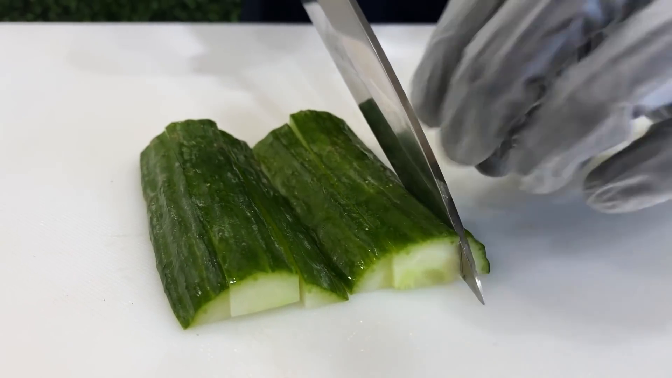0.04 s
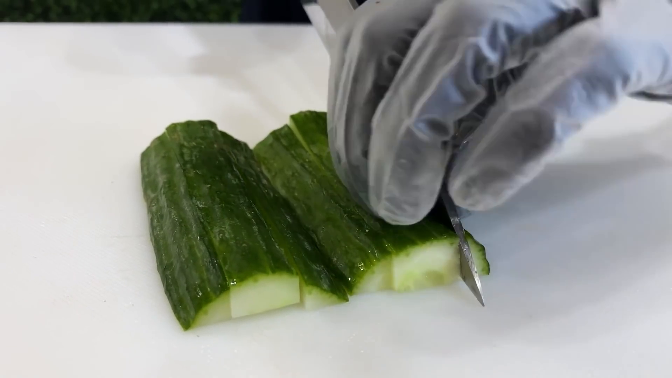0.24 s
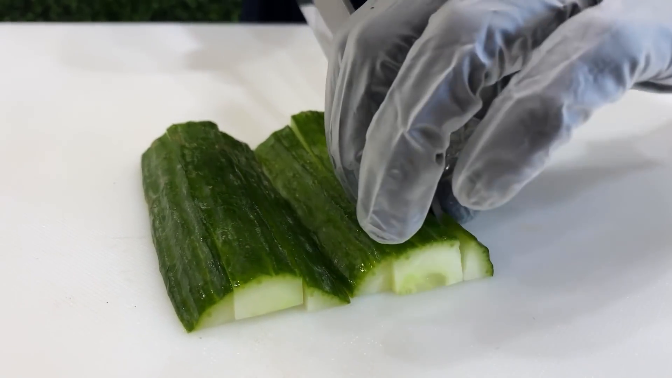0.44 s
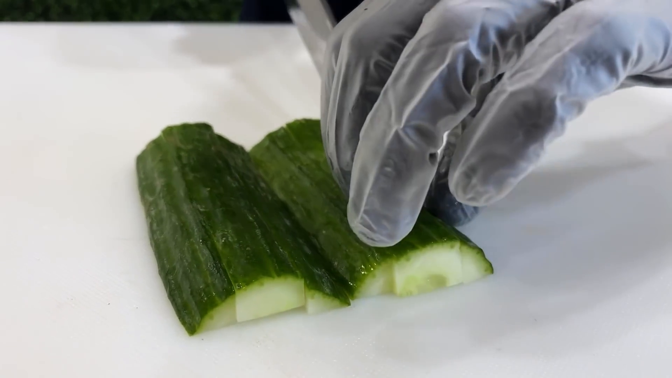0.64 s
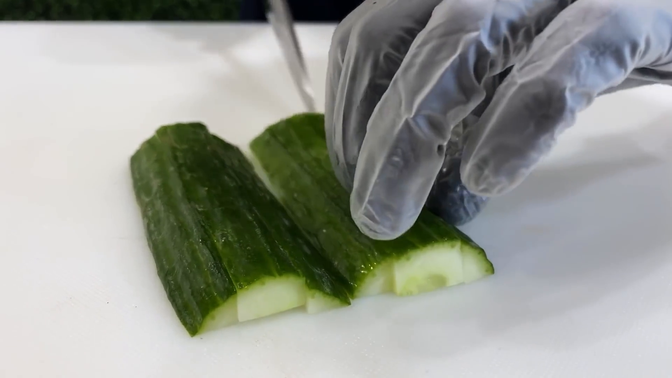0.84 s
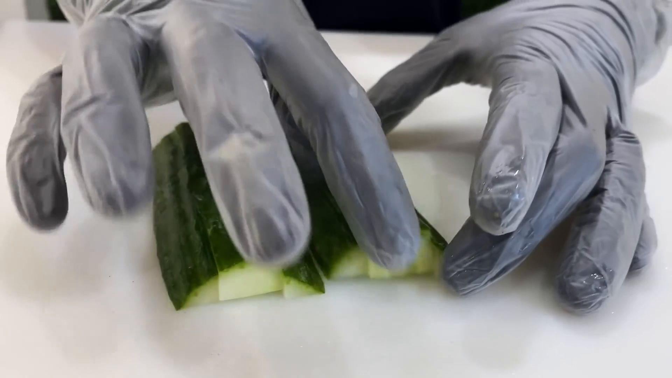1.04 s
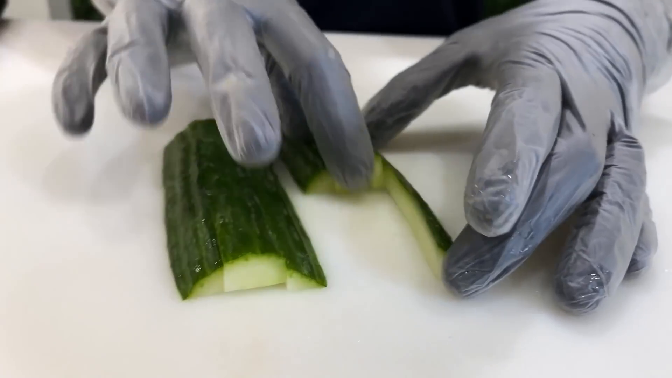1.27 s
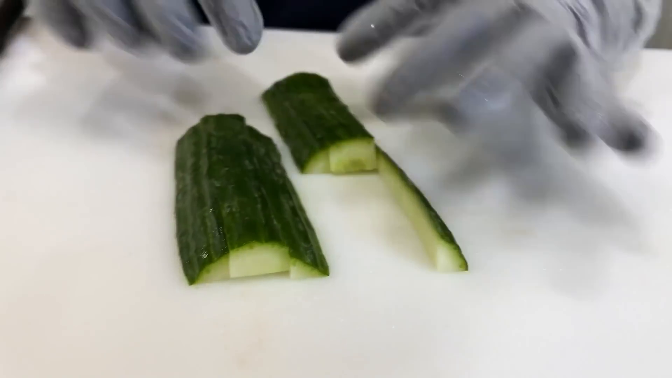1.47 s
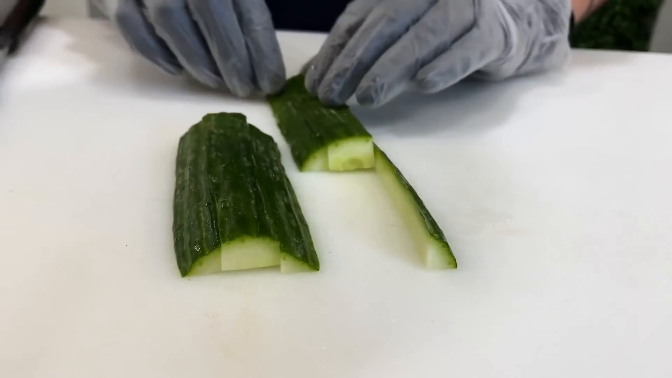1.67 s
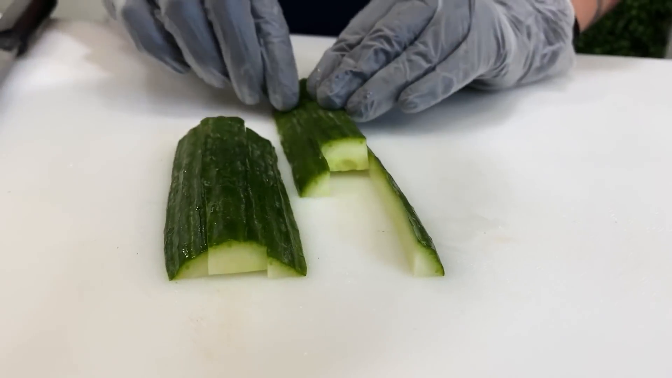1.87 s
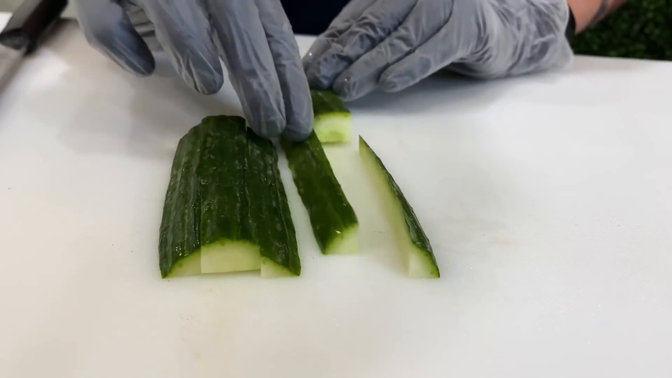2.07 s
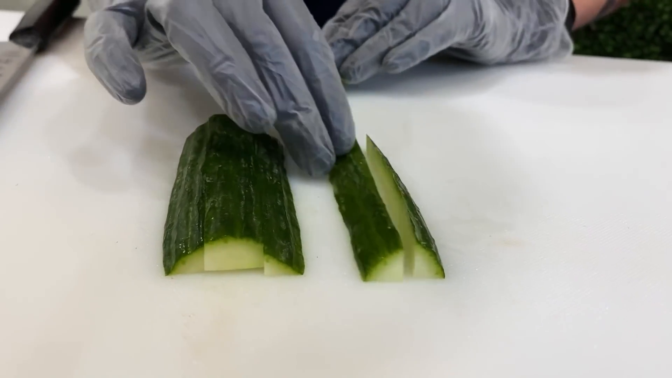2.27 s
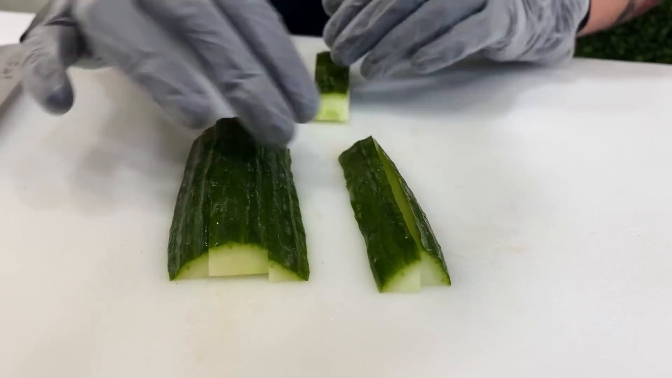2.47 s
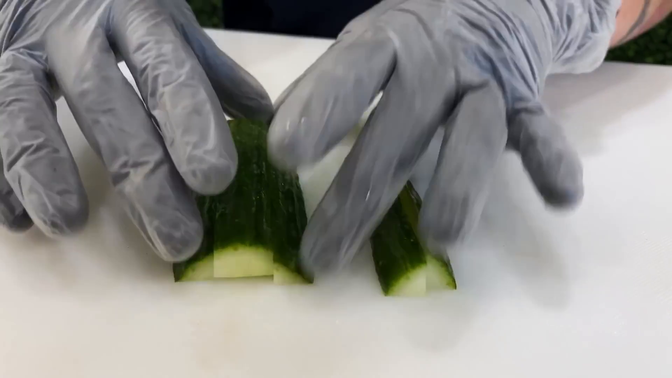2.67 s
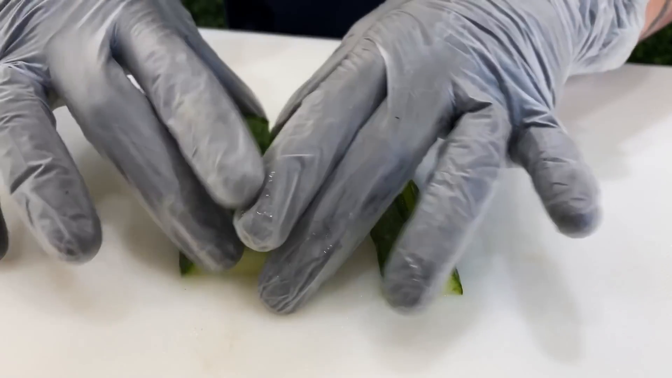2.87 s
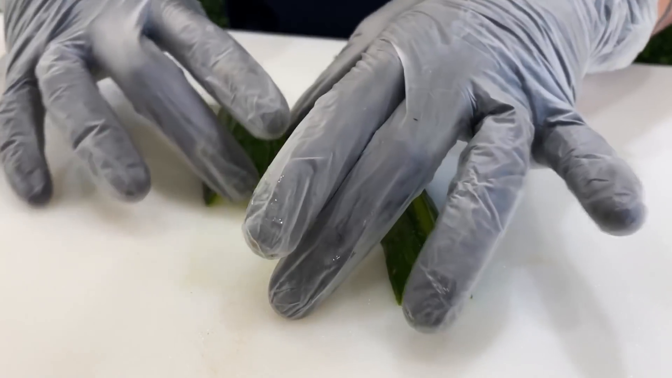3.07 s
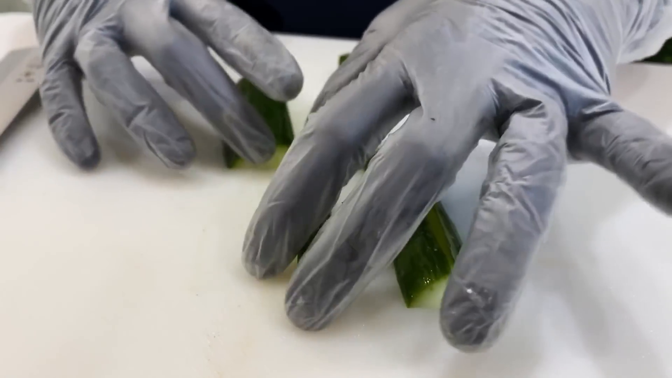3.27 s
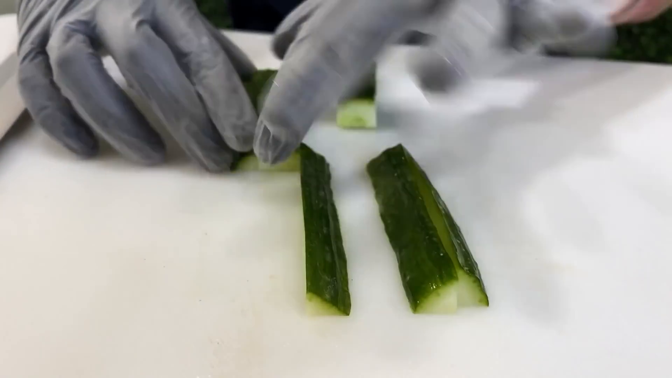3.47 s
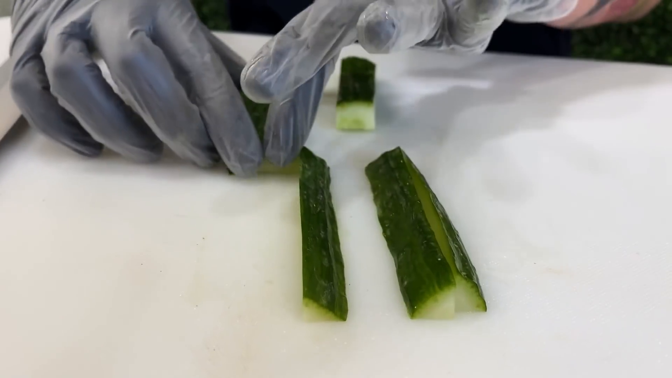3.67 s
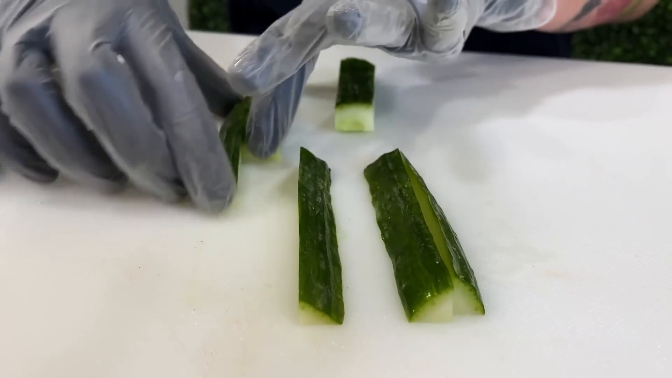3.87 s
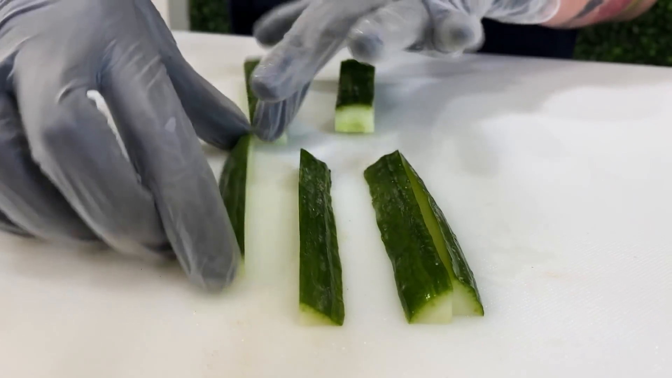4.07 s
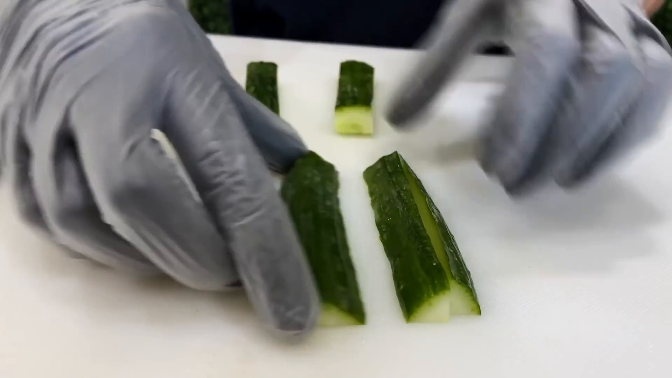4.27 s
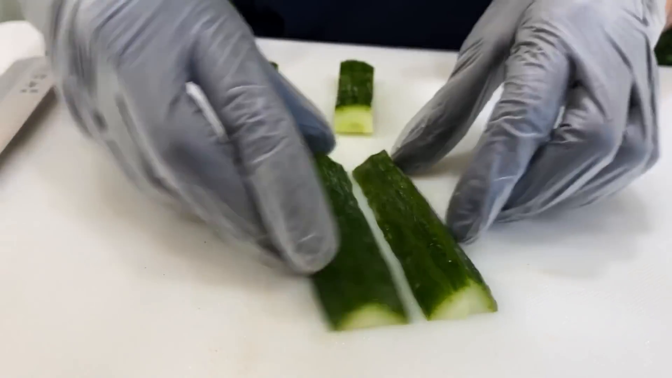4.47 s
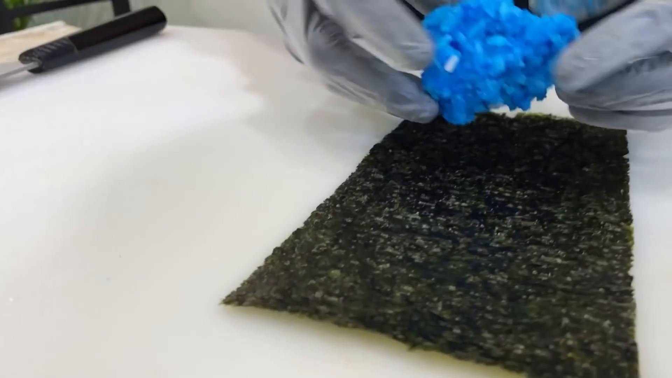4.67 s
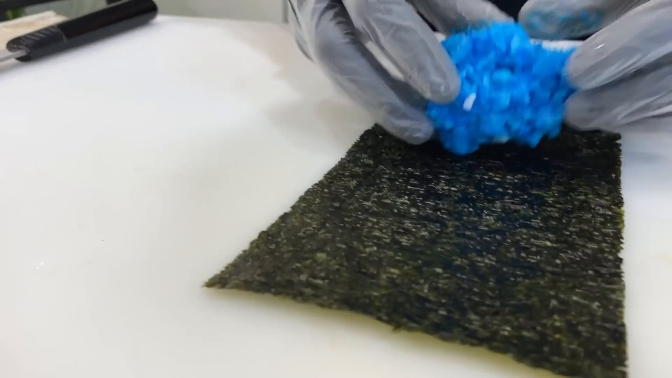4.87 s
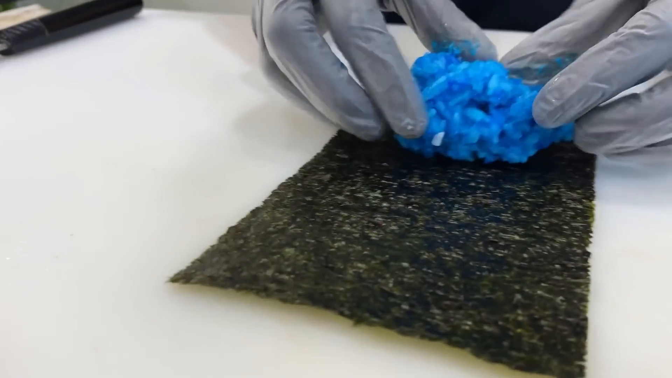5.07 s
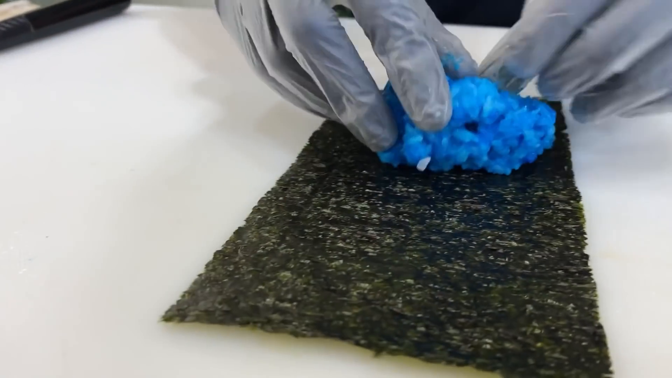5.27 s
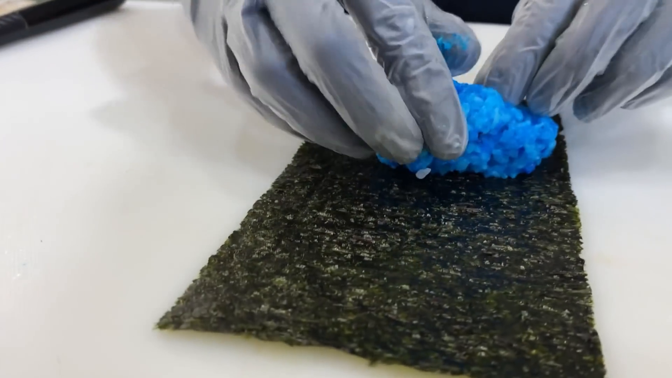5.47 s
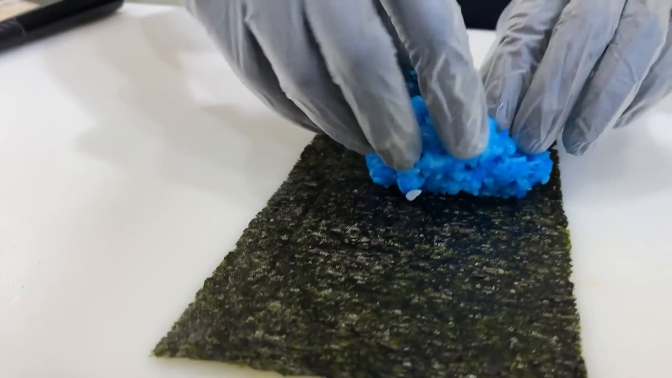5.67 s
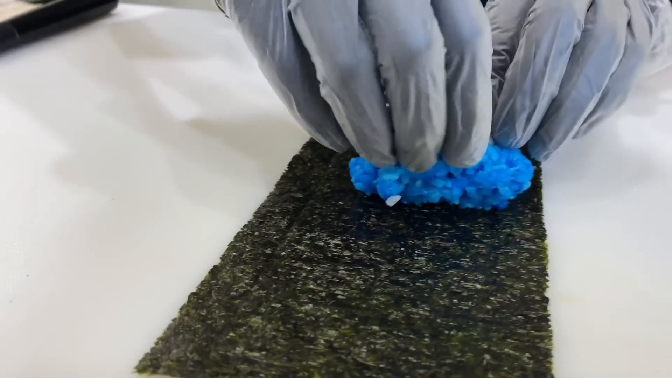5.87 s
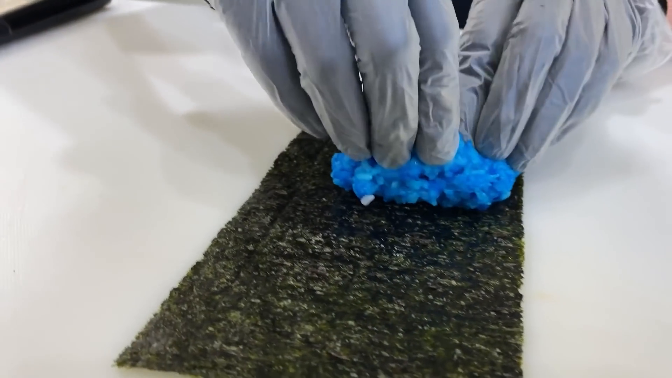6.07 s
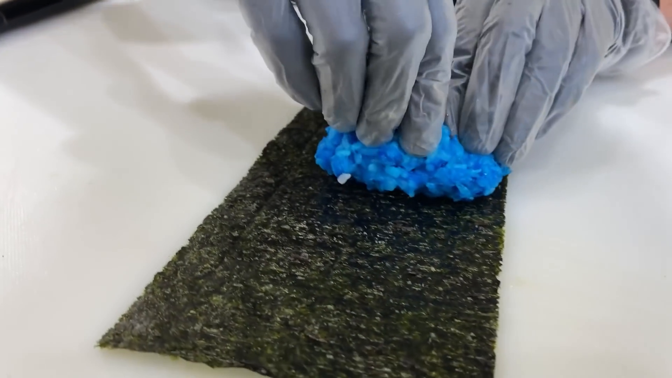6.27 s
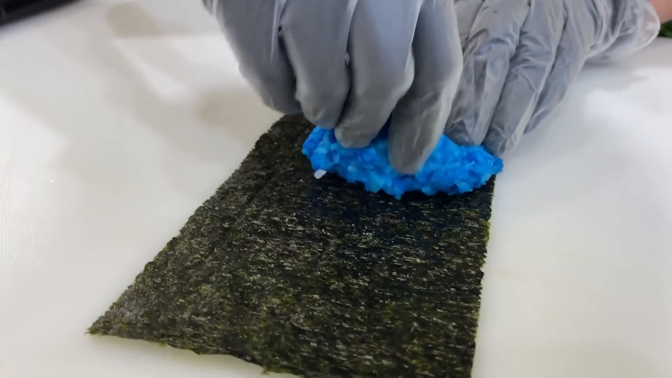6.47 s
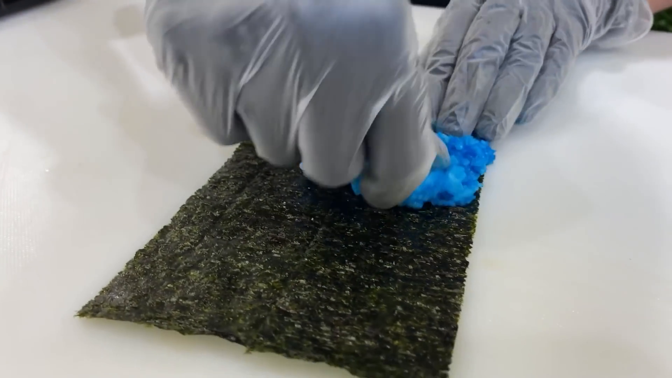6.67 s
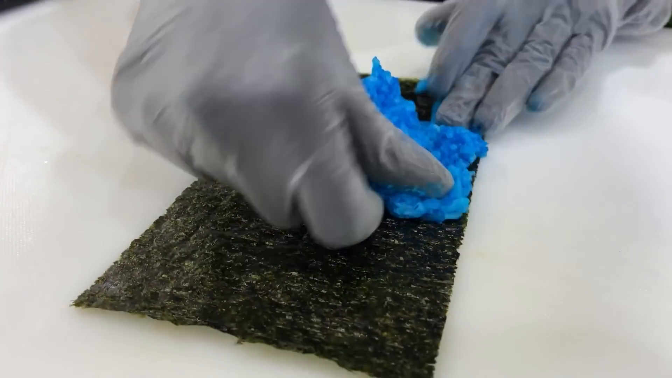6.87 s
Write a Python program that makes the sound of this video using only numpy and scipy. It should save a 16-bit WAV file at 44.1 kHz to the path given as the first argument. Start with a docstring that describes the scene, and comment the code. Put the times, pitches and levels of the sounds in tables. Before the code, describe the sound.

One loud, creaking cut through a cucumber, followed by quiet glove rustles, soft pats and the sticky crackle of rice pressed on seaweed.

```python
"""Cutting a cucumber and pressing rice

A long knife is pressed lengthwise through a cucumber on a plastic board: the skin snaps, the blade
judders in the wet flesh and the creak stops dead. Gloved hands then slide the strips about
and press sticky rice onto a sheet of dried seaweed, close by in a quiet kitchen."""
import sys
import numpy as np
from scipy import signal
from scipy.fft import rfft, irfft, next_fast_len
from scipy.io import wavfile
from scipy.ndimage import uniform_filter1d, map_coordinates

SR = 44100
rng = np.random.default_rng(int(sys.argv[2]) if len(sys.argv) > 2 else 0)


def dump_mix(stems):
    """Bounce the given channels to the path in sys.argv[1] as a 16-bit WAV at rate SR."""
    frames = np.atleast_2d(stems).T  # one column per channel
    limited = np.clip(frames, -1, 1)  # hard clip at full scale
    pcm = np.round(limited * 32767).astype(np.int16)
    wavfile.write(sys.argv[1], SR, pcm)


N = 306054
TIME = np.arange(N) / SR


def amp(db):
    """Turn decibels into a gain."""
    return 10 ** (np.asarray(db) / 20)


def unit(x):
    """Scale a signal to an average (rms) level of 1."""
    return x / np.sqrt(np.mean(x ** 2) + 1e-20)


def along(points, hz):
    """Read between (Hz, value) points on a log frequency axis."""
    freqs, values = np.transpose(points)
    return np.interp(np.log(hz + 1), np.log(freqs + 1), values)


def curves(rows):
    """Turn rows that start with a time into one curve for each other column."""
    times, *columns = np.transpose(rows)
    return [np.interp(TIME, times, column) for column in columns]


def wobble(rate):
    """A smooth random curve with `rate` new values a second."""
    return map_coordinates(rng.standard_normal(int(N * rate / SR) + 4), [TIME * rate])


def filtered(x, response):
    """Filter a sound; `response` gives the gain at each frequency."""
    size = next_fast_len(N + SR // 2)
    return irfft(rfft(x, size) * response(np.fft.rfftfreq(size, 1 / SR)), size)[..., :N]


def coloured(x, spectrum):
    """Shape a sound's tone with (Hz, dB) points."""
    return filtered(x, lambda hz: amp(along(spectrum, hz)))


def resonate(x, modes):
    """Pass a sound through damped resonances, each with its bass rolled off."""
    def response(hz):
        total = 0
        for k, (centre, width, db) in enumerate(modes):
            peak = width * centre / (centre ** 2 - hz ** 2 + 1j * hz * width)
            total += (-1) ** k * amp(db) * peak * hz / (hz - 1j * centre)
        return total
    return filtered(x, response)


def impulses(times, db):
    """A one-sample spike at each time."""
    return np.bincount(np.round(np.asarray(times) * SR).astype(int), amp(db), N)[:N]


def strike(times, db, modes):
    """Blows that ring the resonances up to the given peak levels."""
    return resonate(impulses(times, db), modes) / np.abs(resonate(signal.unit_impulse(N), modes)).max()


def bursts(times, db, t60):
    """A loudness curve that jumps up at each time, then falls 60 dB in t60 seconds."""
    return signal.fftconvolve(impulses(times, db), amp(-60 * TIME[:SR // 4] / t60))[:N]


def strokes(rows, attack_s, release_s, arch_db=3.5):
    """One loudness curve per level column: each stroke rises, swells in an arch and dies away."""
    levels = np.zeros((len(rows[0]) - 2, N))
    for start, length, *db in rows:
        span = slice(max(int((start - attack_s) * SR), 0), int((start + length + release_s) * SR))
        age = TIME[span] - start
        rise = np.clip(age / attack_s + .5, 0, 1)
        arch = amp(-arch_db * np.clip(2 * age / length - 1, -1, 1) ** 2)
        fall = amp(-60 * np.maximum(age - length, 0) / release_s)
        levels[:, span] = np.maximum(levels[:, span], amp(db)[:, None] * rise * arch * fall)
    return levels


def grains(rate, spread_db):
    """Two unrelated streams of tiny uneven clicks, about `rate` a second."""
    hits = (rng.random((2, N)) < rate / SR) * rng.standard_normal((2, N))
    return unit(hits * amp(spread_db * np.clip(rng.standard_normal((2, N)), -2, 2)))


# How alike the two ears' sounds are. Each row: frequency in Hz, likeness from 0 to 1.
LIKENESS = [(60, .82), (350, .78), (700, .35), (2500, .25), (5000, .3), (8000, .86), (14000, .86)]
def spread(pair):
    """Two unrelated signals become left and right, partly alike."""
    def blend(hz):
        angle = np.arccos(along(LIKENESS, hz)) / 2
        return np.array([np.cos(angle), np.sin(angle)])
    mid, side = filtered(pair, blend)
    return np.array([mid + side, mid - side]) / np.sqrt(np.mean(mid ** 2))


def patches(x, depth_db):
    """The tone of a rub shifts as the contact moves."""
    spectra = signal.stft(x, nperseg=512)[2]
    drift = uniform_filter1d(rng.standard_normal(spectra.shape[1:]), size=14, axis=0)
    drift = unit(uniform_filter1d(drift, size=10, axis=1))
    return signal.istft(spectra * amp(depth_db * drift), nperseg=512)[1][:, :N]


def friction(spectrum, clump_db=0, rate=300, patchy_db=0):
    """Stereo rubbing noise that can come in tiny clumps."""
    noise = patches(rng.standard_normal((2, N)), patchy_db)
    clumps = amp(clump_db * np.clip(wobble(rate), -2, 2))
    return spread(coloured(noise * clumps, spectrum))


def nearby(x, wet_db, t60):
    """Worktop and walls send back a short echo, different on each side."""
    t = TIME[:SR // 4]
    tail = rng.standard_normal((2, len(t))) * amp(-60 * t / t60) * (t > .002)
    tail /= np.linalg.norm(tail, axis=1, keepdims=True)
    return x + amp(wet_db) * signal.fftconvolve(x[None], tail, axes=1)[:, :N]


# The hands' weight on the board. Each row: time in seconds, murmur in dB, rumble in dB.
HAND_WEIGHT = [(.18, -66.5, -60.5), (1.15, -62.5, -66.5), (1.48, -71.5, -70), (2.05, -66, -69.5),
               (2.75, -65.5, -63.5), (3.2, -71.5, -73), (3.42, -63.5, -65), (4.1, -64.5, -64.5),
               (5.5, -70.5, -64), (6.06, -66, -67), (6.3, -73, -74), (6.94, -68, -66.5)]
# The tone of the murmur and of the rumble. Each row: frequency in Hz, level in dB.
MURMUR_TONE = [(60, -16), (130, 4), (195, -2), (258, -1.5), (312, -7), (414, -3.5), (511, -9), (581, -17),
               (800, -20.5), (1040, -36), (1760, -120)]
RUMBLE_TONE = [(20, -23.5), (35, -4), (60, 4), (92, -18.5), (120, -3), (260, -120)]
def board(rub):
    """Board and table murmur under the weight of the hands, and more when something slides."""
    murmur_db, rumble_db = curves(HAND_WEIGHT)
    murmur = np.hypot(amp(murmur_db), amp(-5) * rub) * friction(MURMUR_TONE, clump_db=2.5, rate=23)
    return murmur + amp(rumble_db) * friction(RUMBLE_TONE)


# A damp glove on the skin. Each row: start in seconds, length in seconds, level in dB.
GLOVE_SQUEAKS = [(1.33, 0.033, -65.5), (1.52, 0.16, -77), (2.48, 0.082, -73)]
# The ring of a wet contact. Its one row: frequency in Hz, width in Hz, level in dB.
WET_RING = [(2740, 520, 0)]
def squeaks():
    """Fine slips of a damp glove ring one narrow band."""
    level, = strokes(GLOVE_SQUEAKS, attack_s=.04, release_s=.11)
    return level * spread(resonate(grains(rate=1100, spread_db=-3), WET_RING))


# Clicks under the glove. Each row: time in seconds, peak level in dB.
WET_CLICKS = [(0.077, -60), (.136, -63), (0.174, -56), (2.552, -51), (5.677, -52), (6.922, -44)]
def clicks():
    """Small wet contacts let go, each with one short ring."""
    return nearby(strike(*np.transpose(WET_CLICKS), WET_RING), wet_db=-15, t60=.015)


# Dragging a strip. Each row: start in seconds, length in seconds, level in dB.
STRIP_DRAGS = [(3.0, 0.21, -69.5), (3.74, 0.4, -66.5)]
# How a wet strip rings on the board. Each row: frequency in Hz, width in Hz, level in dB.
STRIP_RING = [(716, 270, -6), (945, 290, -6.5), (1218, 70, -4.5), (2030, 66, -28)]
def drags():
    """A dragged strip catches finely on the board, which sets it ringing."""
    level, = strokes(STRIP_DRAGS, attack_s=.03, release_s=.22)
    return level * spread(resonate(grains(rate=600, spread_db=0), STRIP_RING))


# Things land on the board. Each row: time in seconds, pat in dB, thud in dB,
# the smear's fade time in seconds, pitch as a multiple of a usual strip's.
LANDINGS = [(0.169, -72, -52.5, 0.051, 1.3), (2.685, -59, -52.5, 0.042, 0.9),
            (3.355, -50, -68, 0.036, 1.06), (4.061, -50, -58, 0.23, 1.05), (4.305, -46, -45, 0.053, 1.13),
            (4.316, -56, -45, 0.04, 1.2), (4.445, -47, -55, 0.17, 1.24), (5.08, -47.5, -52, 0.027, 1.03)]
# A hand leans on the table. Each row: time in seconds, peak level in dB.
TABLE_BUMPS = [(3.829, -50), (4.075, -48)]
# How a soft thud and the table ring. Each row: frequency in Hz, width in Hz, level in dB.
THUD_RING = [(139.5, 40, -14), (257, 32, 0.5), (405, 36, -3.5), (504, 49, -8.5)]
TABLE_RING = [(50, 7.8, 0)]
def taps():
    """Strips and fingertips land with a pat, a wet smear and a thud; smaller pieces ring higher."""
    noise = spread(rng.standard_normal((2, N)))
    pats = 0
    for time, db, _, t60, pitch in LANDINGS:
        modes = [(hz * pitch, width, level) for hz, width, level in STRIP_RING]
        smear = bursts([time], [db - 7], t60) * unit(resonate(noise, modes))
        pats = pats + strike([time], [db], modes) + smear
    times, _, thud_db, *_ = np.transpose(LANDINGS)
    thuds = nearby(strike(times, thud_db, THUD_RING), wet_db=-3, t60=.56)
    return pats + thuds + strike(*np.transpose(TABLE_BUMPS), TABLE_RING)


# Light contact between strokes. Each row: time in seconds, hiss in dB.
LIGHT_TOUCH = [(.3, -92), (.96, -79), (1.12, -72), (1.78, -75), (2.42, -71.5), (2.96, -70.5), (3.38, -74.5),
               (3.55, -71), (3.7, -76.5), (3.9, -86), (4.66, -70), (4.77, -86.5), (4.98, -72.5),
               (5.22, -80), (5.6, -67.5), (5.95, -88.5), (6.27, -87.5), (6.42, -76), (6.94, -62.5)]
# Strokes on the cucumber, then on the rice. Each row: start in seconds, length in seconds,
# hiss in dB, fine top of the hiss in dB, rubbing in dB.
CUCUMBER_STROKES = [(0.0, 0.033, -67.5, -64, -71), (0.15, 0.033, -73, -75, -70.5),
                    (1.025, 0.089, -63.5, -63, -62.5), (1.23, 0.12, -66, -63, -67),
                    (1.6, 0.1, -71, -67.5, -73), (1.89, 0.17, -61.0, -61, -62),
                    (2.04, 0.17, -69, -64.5, -64.5), (2.293, 0.019, -60, -57.5, -67),
                    (2.49, 0.12, -66, -63.5, -77), (2.718, 0.028, -60.5, -67, -77.5),
                    (2.84, 0.066, -63, -61.5, -69.5), (3.225, 0.023, -60.5, -62, -66),
                    (3.418, 0.049, -58, -63.5, -68.5), (3.56, 0.078, -62, -64, -81),
                    (3.745, 0.089, -59, -58.5, -63.5), (3.84, 0.57, -60, -60, -66),
                    (4.16, 0.155, -53.5, -59.5, -64), (4.33, 0.085, -62.5, -62.5, -63.5),
                    (4.42, 0.063, -59.5, -64, -58.5)]
RICE_STROKES = [(4.87, 0.061, -70, -67, -77), (5.056, 0.027, -55, -57, -56.5),
                (5.257, 0.072, -65.5, -68, -65.5), (5.34, 0.064, -80, -69, -65),
                (5.485, 0.077, -60.5, -66, -69), (5.67, 0.038, -60.5, -69, -84),
                (5.76, 0.084, -64, -62.5, -84), (6.678, 0.062, -60, -51.5, -76),
                (6.732, 0.03, -53, -49, -76), (6.78, 0.22, -62.5, -62.5, -69.5),
                (6.895, 0.113, -54, -53.5, -59.5)]
def effort():
    """How loud the hands' hiss, its fine top and their rubbing are: shaky strokes over a light touch."""
    touch_db = curves(LIGHT_TOUCH)[0] + wobble(30)
    light = amp([touch_db, touch_db - .5, .48 * touch_db - 40.5])
    brushing = strokes(CUCUMBER_STROKES, attack_s=.022, release_s=.13)
    pressing = strokes(RICE_STROKES, attack_s=.015, release_s=.21)
    return np.maximum(light, brushing + pressing) * amp(.78 * wobble(45))


def hissing(noise, hiss, fine, split_hz=9400):
    """Split a hiss into its body and its fine top, each with its own level."""
    top = filtered(noise, lambda hz: 1 / (1 + (split_hz / (hz + 1)) ** 12))
    return hiss * unit(noise - top) + fine * unit(top)


# The tones of glove, sliding strips and creases. Each row: frequency in Hz, level in dB.
GLOVE_TONE = [(1000, -35), (1900, -23), (2900, -10), (5200, -2), (6500, -1.5), (8500, -1.5), (11000, -2.5),
              (15800, -8.5)]
SLIDE_TONE = [(350, 2.5), (600, -1), (850, 2), (1150, -2), (1600, -3.5), (2600, -20.5), (4500, -22),
              (9000, -49)]
CREASE_TONE = [(1200, -26), (2000, 2), (2800, 0.5), (3800, -3), (6000, -34)]
def gloves_on_cucumber(hiss, fine, rub):
    """Gloves brush the cucumber and slide its strips; their creases crinkle even at a light touch."""
    glove = hissing(friction(GLOVE_TONE, clump_db=1.8, rate=540, patchy_db=1.7), hiss, fine)
    strips = rub * friction(SLIDE_TONE, clump_db=2, rate=190, patchy_db=1.5)
    creases = np.sqrt(hiss) * amp(-41.5) * friction(CREASE_TONE, clump_db=3, rate=350, patchy_db=2.5)
    return glove + strips + creases


# The tones of rice and of pressed seaweed. Each row: frequency in Hz, level in dB.
RICE_TONE = [(1500, -11.5), (2800, 0), (4000, -7), (7400, -3), (9000, 0), (12000, -1.5), (14500, 0.5),
             (15800, -3)]
PRESS_TONE = [(350, -16), (550, 1.5), (800, -1.5), (1300, 0), (1900, -2), (4500, -8.5), (9000, -15)]
def rice_on_seaweed(hiss, fine, rub):
    """Countless sticky contacts let go in the rice, and the dry sheet crackles as it bends."""
    sticky = amp(-13) * spread(coloured(grains(rate=900, spread_db=7), RICE_TONE))
    rice = hissing(friction(RICE_TONE, clump_db=2, rate=520, patchy_db=2.5) + sticky, hiss, fine)
    crisp = amp(-4) * spread(coloured(grains(rate=300, spread_db=7), PRESS_TONE))
    seaweed = rub * unit(friction(PRESS_TONE, clump_db=2, rate=230) + crisp)
    return rice + seaweed


# Tiny cracks. Each row: time in seconds, rough peak level in dB,
# low part compared with the high part in dB, fade time in seconds.
TINY_CRACKS = [(.038, -47, -20.5, .012), (.052, -47, -24, .008), (.082, -48, -18, 0.011),
               (2.565, -39.5, -11, 0.021), (2.637, -44, -9, 0.036), (2.687, -43.5, -20, 0.037),
               (4.5494, -39.5, 1.5, 0.025), (4.599, -39, -4, 0.011), (4.614, -36, -1.5, 0.019),
               (5.049, -32.5, -30, 0.024), (5.072, -35, -15, 0.024), (5.0805, -40, -0.5, 0.029),
               (5.1687, -32, -19, 0.0042), (5.281, -43, -5, .012), (5.297, -32.5, -15, 0.0095),
               (5.3638, -38, -13, .007), (5.52, -33, -9, .007), (5.535, -44.5, 6, 0.037),
               (5.672, -37, -14, 0.019), (5.681, -41, -15, .012), (5.714, -42, -4, 0.009),
               (6.5288, -40, -8, 0.013), (6.622, -42, -18, .008), (6.673, -35, -19, 0.02),
               (6.692, -32, -24, .01), (6.7323, -30.5, -27, 0.021)]
# The tone of their high part. Each row: frequency in Hz, level in dB.
CRACK_TONE = [(1500, -10.5), (3000, -5), (6000, -6.5), (10000, 1), (14000, -0.5), (15800, -8)]
def ticks(crest_db=12.5):
    """Creases flick and sticky grains let go, each with a crackle that builds within a millisecond."""
    high, low = np.zeros((2, N))
    for time, db, low_db, t60 in TINY_CRACKS:
        start = round(time * SR)
        fall = amp(db - crest_db - 60 * TIME[:SR // 16] / t60)[:N - start]
        high[start:start + len(fall)] += fall
        low[start:start + len(fall)] += amp(low_db) * fall
    high, low = np.abs(uniform_filter1d([high, low], size=40))
    return high * friction(CRACK_TONE, clump_db=3.5, rate=640) + low * friction(PRESS_TONE)


CUT_START_S, STOP_S = .3, .899
def stop_click(ring_hz=1050, ring_db=-70, t60=1):
    """A sharp click marks the creak's abrupt stop, followed by a faint ring."""
    age = np.maximum(TIME - STOP_S, 0)
    click = strike([STOP_S - .0005], [-28], [(1800, 2100, -4), (6000, 22000, -14)])
    return click + amp(ring_db - 60 * age / t60) * np.sin(2 * np.pi * ring_hz * age)


# The loudest snaps of the skin. Each row: time in seconds, level in dB, hollow share from 0 to 1.
SKIN_SNAPS = [(0.375, -38.5, 0.95), (.385, -44, 0.8), (.411, -41, 0.6), (.427, -29, 0.7), (.451, -32, .5),
              (.460, -34, 0.6), (.474, -30, .3), (.482, -32, .15), (.496, -32.5, .1), (0.517, -33, 0.9),
              (.538, -32.5, 0.4), (.557, -31, .3), (.564, -29, 0.5), (.574, -33, .1), (.584, -34, 0.6),
              (.590, -30, .2), (.599, -30.5, 0), (0.614, -31, 0), (.620, -26.5, 0), (.629, -26, 0),
              (.643, -34, 0), (.672, -33, 0), (.687, -31.5, 0.3), (.695, -29, 0.2), (.722, -29.5, 0)]
# How skin and blade ring, and a hollow snap deep in the flesh.
# Each row: frequency in Hz, width in Hz, level in dB.
SKIN_RING = [(815, 57, 10), (1220, 624, 9.5), (1420, 570, 4.5), (1420, 350, -7.5), (2530, 500, -16),
             (3550, 240, -12)]
HOLLOW_RING = [(774, 116, -0.5), (956, 155, 1)]
def snaps():
    """The skin snaps fibre by fibre, and the wet flesh muffles the edge of each snap."""
    times, db, hollow = np.transpose(SKIN_SNAPS)
    hollow = np.clip(hollow, .01, .99)
    rings = sum(strike(times, db + 6.5 + 20 * np.log10(share), modes)
                for share, modes in [(1 - hollow, SKIN_RING), (hollow, HOLLOW_RING)])
    muffle = [(1250, -8.5), (1600, -6), (1850, -18.5), (2200, -8.5),
              (2900, -20), (4000, -10), (6000, -9.5)]
    return coloured(nearby(rings, wet_db=-6, t60=.022), muffle)


# Tearing cells. Each row: time in seconds, crunch in dB, fizz of juice in dB.
TEARING = [(.3, -90, -85), (0.38, -62.5, -60.5), (0.448, -56, -60), (0.554, -51, -59), (0.648, -46.5, -66),
           (.76, -45, -63), (0.826, -45.5, -60), (0.89, -44.5, -64.5)]
# How the last, taut bit of skin rings. Each row: frequency in Hz, width in Hz, level in dB.
TAUT_RING = [(805, 280, 8), (1470, 330, 0.5), (2240, 164, 0), (2850, 120, -6.5), (4020, 580, -9)]
# The tone of spraying juice. Each row: frequency in Hz, level in dB.
JUICE_TONE = [(1650, -31), (2800, -6), (3850, -2), (4960, -6.5), (7600, 1), (8240, -5), (9870, 0.5),
              (15800, -4.5)]
def crunch():
    """Bursting cells ring higher as the remaining skin gets short; juice sprays, more at each snap."""
    crunch_db, fizz_db = curves(TEARING)
    cells = grains(rate=2400, spread_db=2)
    long_skin = amp(3.5) * unit(resonate(cells, SKIN_RING))
    short_skin = amp(1.5) * unit(resonate(cells, TAUT_RING))
    taut = np.interp(TIME, [.64, .8], [0, 1])
    tearing = spread((1 - taut) * long_skin + taut * short_skin)
    snap_times, snap_db, _ = np.transpose(SKIN_SNAPS)
    spray = amp(fizz_db) + bursts(snap_times, snap_db - 43.5, t60=.0065)
    return amp(crunch_db) * tearing + spray * friction(JUICE_TONE, clump_db=2, rate=380, patchy_db=3)


# The blade sticks and slips ever faster. Each row: time in seconds, slips per second.
SLIP_SPEED = [(.325, 38), (.5, 44.2), (.535, 51.5), (.57, 56), (.62, 66), (.68, 68.8), (.74, 78.5),
              (.78, 91.5), (.82, 110.8), (.86, 125), (.9, 127.5)]
# How hard the slips kick. Each row: time in seconds, whole body in dB, stiff end in dB.
SLIP_FORCE = [(.35, -52, -56), (.385, -37, -44), (.43, -33.5, -36), (.48, -31.5, -39), (.52, -32, -37),
              (.56, -24, -38), (.595, -36, -35), (.625, -29, -31), (.655, -27, -32), (.675, -32, -31),
              (.7, -26, -25.5), (.72, -27, -33), (.74, -26, -25.5), (.757, -31.5, -32), (.778, -25, -34),
              (.81, -35.5, -28.5), (.838, -27.5, -30.5), (.86, -29, -27.5), (.895, -34, -23)]
# How cucumber and board ring together, and the cucumber's short, stiff end.
# Each row: frequency in Hz, width in Hz, level in dB.
BODY_RING = [(133, 33, -12.5), (238, 27, -3), (266, 23, 0)]
END_RING = [(338, 32, -6), (379, 32, 2.5), (431, 39, -5.5), (490, 36, -5.5), (623, 47, -17), (860, 90, -17)]
def judder(jitter_s=.00018, scatter_db=1.5):
    """Each slip kicks the cucumber; the groan swells when a multiple of the rate meets a resonance."""
    rate, = curves(SLIP_SPEED)
    slip_count = np.floor(np.cumsum(rate * (TIME > SLIP_SPEED[0][0])) / SR)
    slips = np.flatnonzero(np.diff(slip_count)) / SR
    slips = slips[slips < STOP_S]
    late, extra_db = (rng.standard_normal((200, 2))[:len(slips)] * [jitter_s, scatter_db]).T
    times, body_db, end_db = np.transpose(SLIP_FORCE)
    return sum(strike(slips + late, np.interp(slips, times, db) + extra_db, modes)
               for db, modes in [(body_db, BODY_RING), (end_db, END_RING)])


# The halves rock against each other, heard as width. Each row: frequency in Hz, side level in dB.
ROCKING_WIDTH = [(110, -5), (230, -18), (370, -8), (520, 1.5), (900, 0.5)]
def creak():
    """The judder speeds up and swells as the blade sinks in; loud snaps kick the body too."""
    snap_times, snap_db, _ = np.transpose(SKIN_SNAPS)
    mid = judder() + strike(snap_times, snap_db - 11, THUD_RING)
    # rocking is a quarter cycle out of step with the push on the board
    side = filtered(mid, lambda hz: 1j * amp(along(ROCKING_WIDTH, hz)))
    return nearby(mid, wet_db=-18, t60=.06) + np.array([side, -side])


def knife(fade_s=.003):
    """The creak and crunch stop within a few milliseconds; so small a body gives off no deep bass."""
    bass_cut = signal.butter(4, 85, "highpass", fs=SR, output="sos")
    cut = signal.sosfilt(bass_cut, creak() + snaps() + crunch())
    audible = np.clip(np.minimum(TIME - CUT_START_S, STOP_S - TIME) / fade_s + .5, 0, 1)
    return cut * audible


def leaning(x, balance):
    """Tilt a stereo sound to one side, band by band."""
    return filtered(x, lambda hz: amp(along(balance, hz) * np.array([[.5], [-.5]])))


# Where hands and knife are heard. Each row: frequency in Hz, left minus right in dB.
HAND_BALANCE = [(60, -1), (200, 0.5), (1290, 2), (2380, 5), (4400, 3), (8120, 0)]
KNIFE_BALANCE = [(120, 7), (250, 1), (500, 3), (1000, -2), (2200, 4), (8000, .3)]
RICE_START_S = 4.72
def scene():
    """A little to the left, the hands cut the cucumber, move its strips and then turn to the rice."""
    hiss, fine, rub = effort()
    cucumber = gloves_on_cucumber(hiss, fine, rub)
    hands = np.where(TIME < RICE_START_S, cucumber, rice_on_seaweed(hiss, fine, rub))
    handling = hands + squeaks() + drags() + board(rub) + ticks() + clicks() + taps()
    return leaning(knife(), KNIFE_BALANCE) + stop_click() + leaning(handling, HAND_BALANCE)


TOP_HZ = 15950
def record(dry):
    """Cut off the very highest treble."""
    return filtered(dry, lambda hz: hz < TOP_HZ)


dry = scene()
out = record(dry)
dump_mix(out)
```